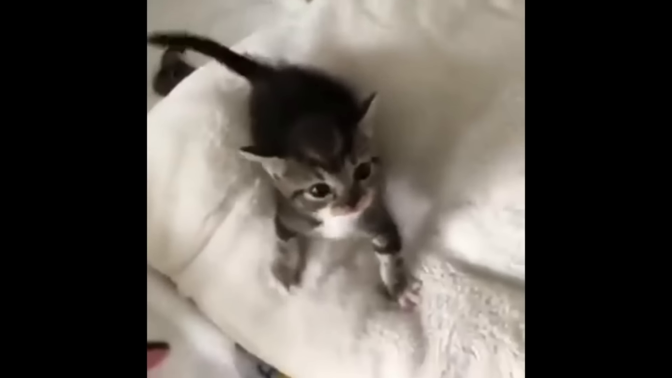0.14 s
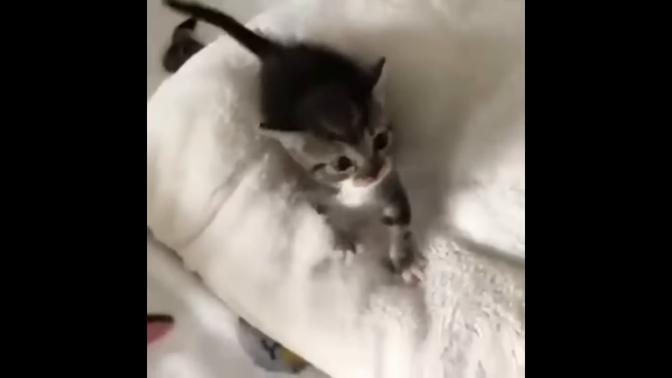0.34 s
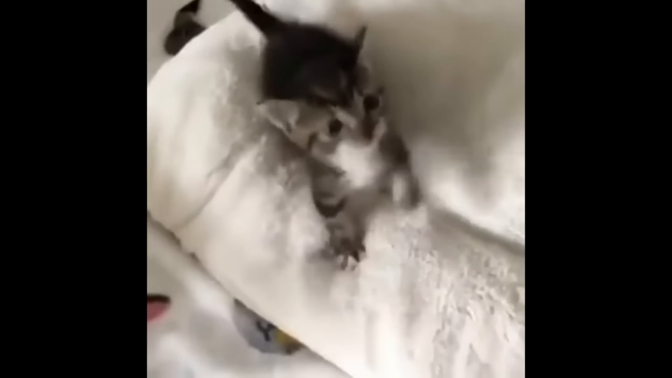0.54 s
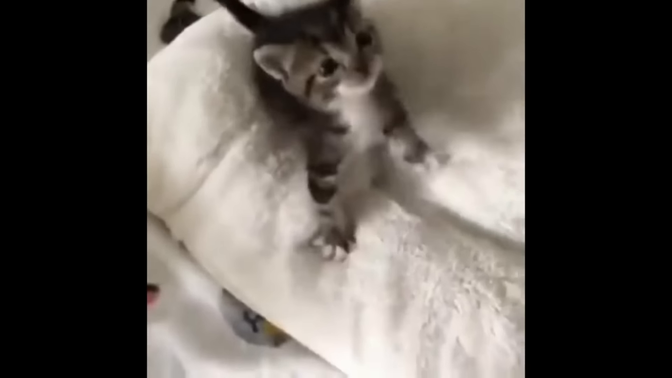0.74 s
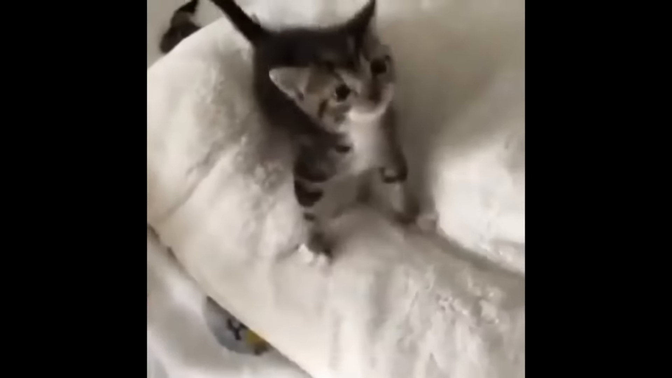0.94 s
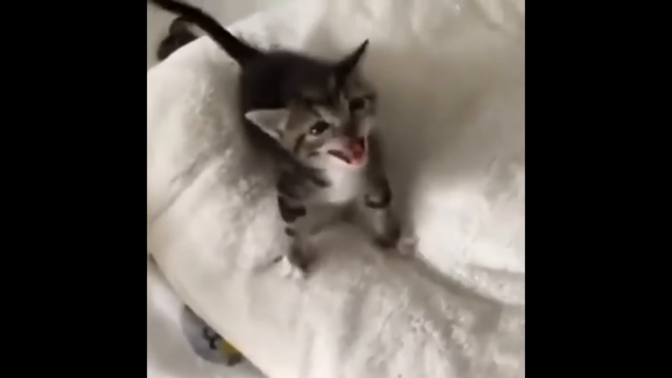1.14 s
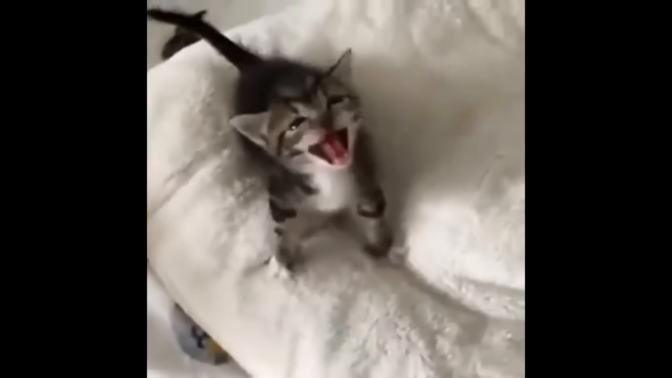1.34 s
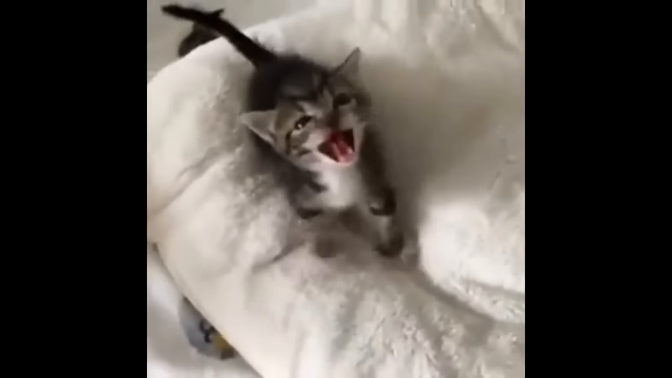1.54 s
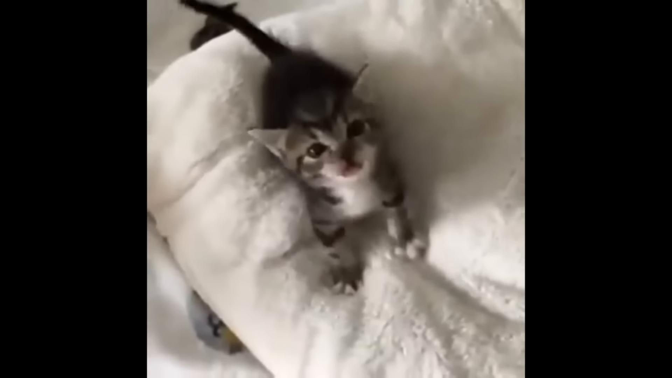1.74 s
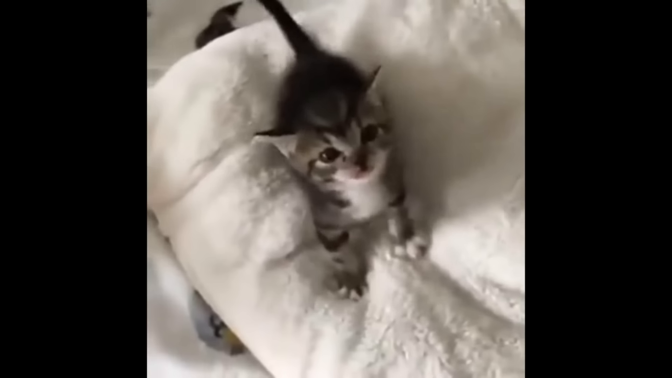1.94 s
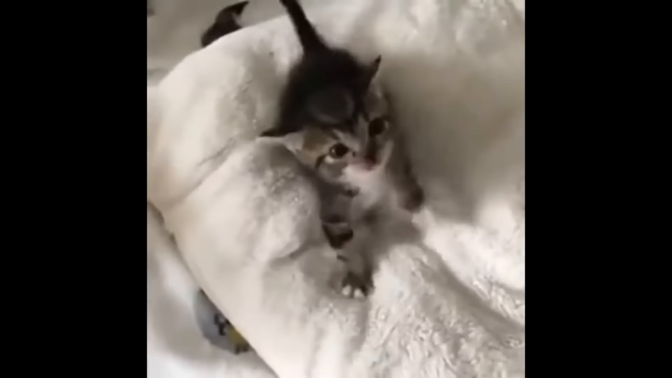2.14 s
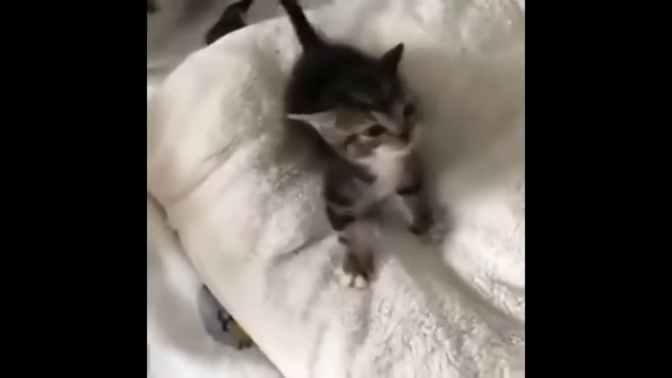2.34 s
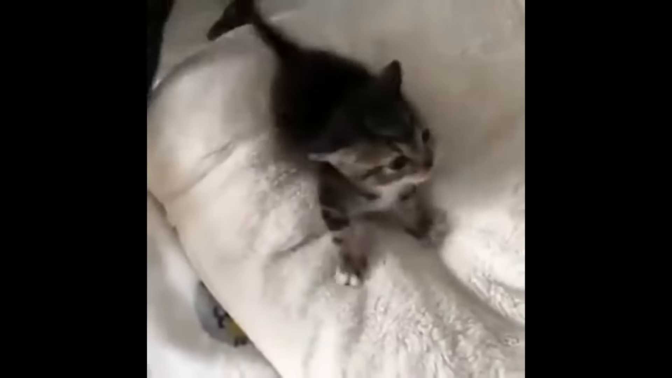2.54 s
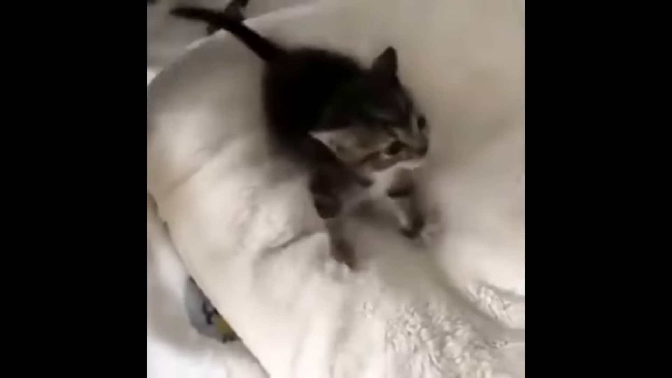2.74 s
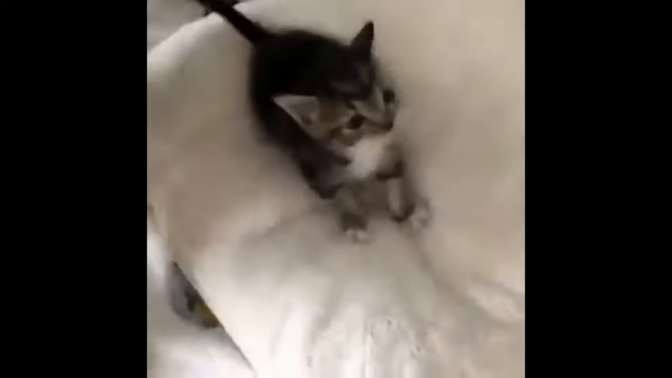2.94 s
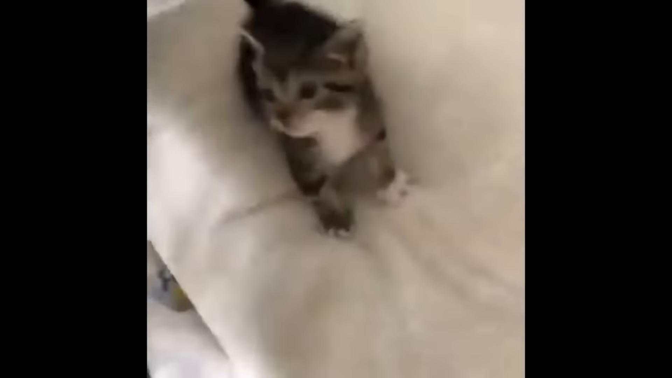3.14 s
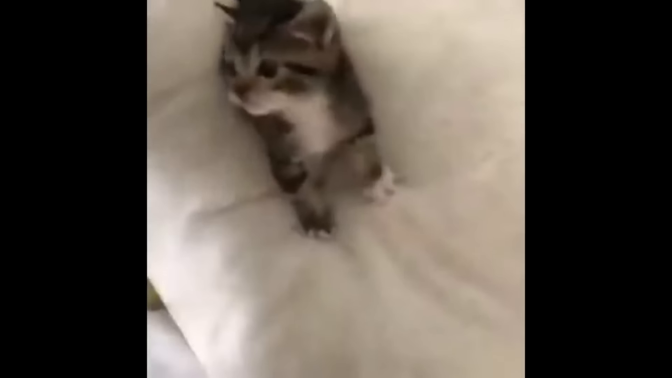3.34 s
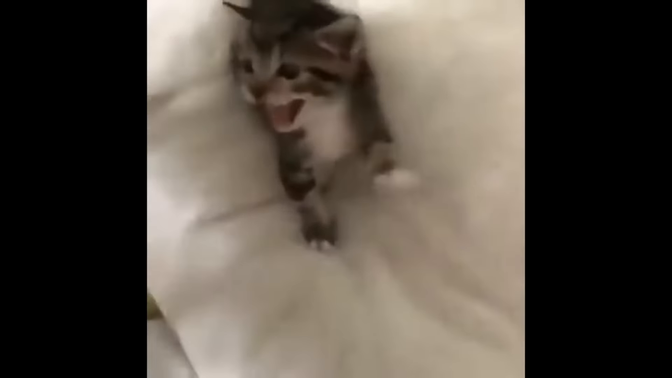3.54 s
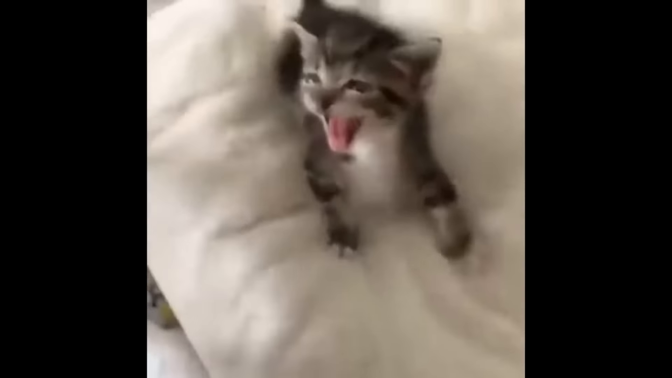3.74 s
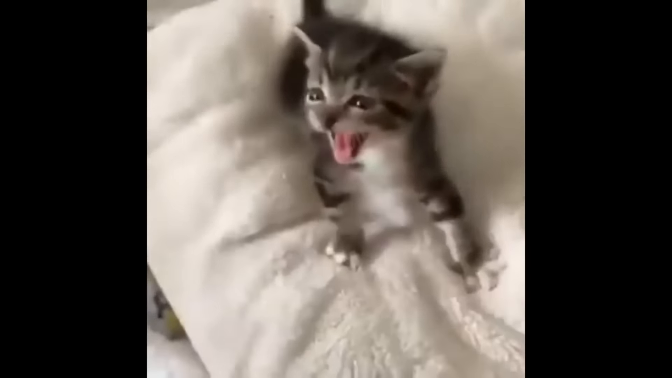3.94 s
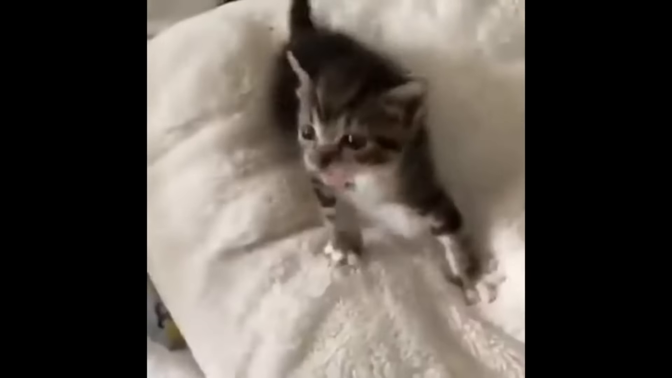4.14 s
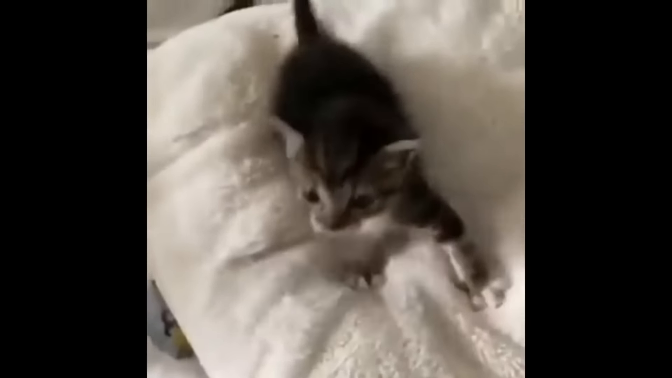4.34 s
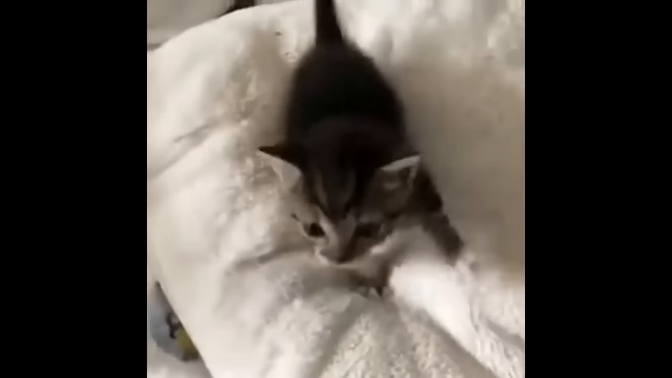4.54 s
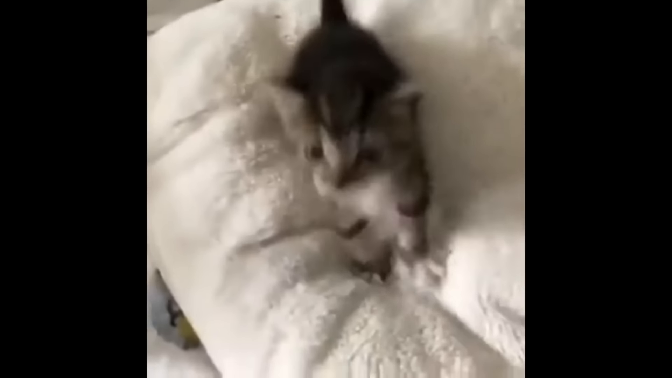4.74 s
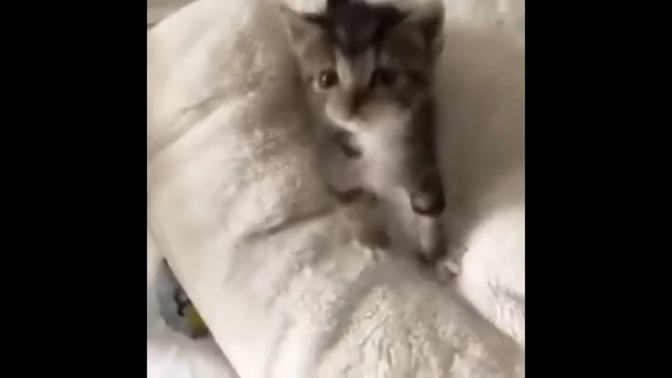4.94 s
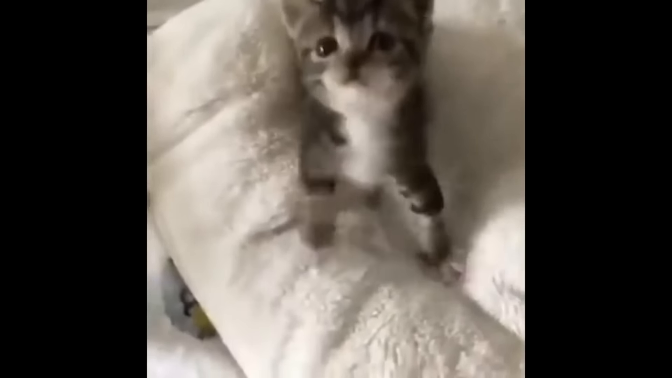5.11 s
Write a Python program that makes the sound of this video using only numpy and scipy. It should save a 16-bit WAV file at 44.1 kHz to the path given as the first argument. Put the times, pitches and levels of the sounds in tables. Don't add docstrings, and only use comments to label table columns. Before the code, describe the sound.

Piercing kitten meows, spaced by quiet gaps, on a soft blanket indoors, with a faint motor hum and hiss behind.

```python
import sys
import numpy as np
from scipy import signal
from scipy.fft import rfft, irfft, next_fast_len
from scipy.io import wavfile
from scipy.ndimage import uniform_filter1d, minimum_filter1d, map_coordinates

SR = 44100
rng = np.random.default_rng(int(sys.argv[2]) if len(sys.argv) > 2 else 0)


def convert_level_to_amplitude(level_db):
    exponent = np.asarray(level_db, float) / 20
    return 10 ** exponent


def dump(signal):
    limited = np.clip(np.atleast_2d(signal).T, -1, 1)
    pcm = np.round(limited * 32767).astype(np.int16)
    wavfile.write(sys.argv[1], SR, pcm)


N = 232583

# start_s, pitch_hz
CRY_PITCH = [
    [(0, 1703), (.062, 1671), (.082, 1787), (.13, 1801), (.142, 1679), (.165, 1628)],
    [(1.358, 978), (1.414, 1815), (1.465, 1830), (1.487, 1751), (1.63, 1736), (1.71, 1724), (1.838, 1643),
     (1.9, 1671), (1.942, 1740)],
    [(3.73, 844), (3.83, 1802), (3.875, 1814), (3.975, 1728), (4.04, 1699), (4.13, 1628), (4.237, 1689),
     (4.33, 1599), (4.357, 1738)],
]
RELEASE_S, FALL_HZ_PER_S = 0.095, 8600
# start_s, level_db, opening (0 to 1)
CRY_EFFORT = [
    [(0, -10, .59), (.062, -9.5, 0.53), (.082, -26.5, 0.58), (.1, -33, 0.78), (.13, -32, 0.72),
     (.142, -50, 0.7), (.175, -58, 0.47), (.27, -50, .02)],
    [(1.36, -53, .6), (1.417, -22, 0.76), (1.465, -10, 0.78), (1.6, -5.5, 0.75), (1.71, -5.5, .73),
     (1.838, -9, 0.5), (1.875, -30, 0.48), (1.935, -38.5, .55), (1.97, -71, 0.45)],
    [(3.755, -54, 0.48), (3.83, -15.5, 0.78), (3.885, -10.5, 0.83), (3.903, 1.5, 0.86), (3.975, -6, 0.79),
     (4.065, -7, .77), (4.09, -9.5, 0.74), (4.25, -14, 0.67), (4.37, -56, 0.53)],
]
# start_s, depth_hz, drop_s, recovery_s
VOICE_BREAKS = [
    (1.427, 55.7, .006, .012),
    (3.9, 240.2, .009, .038),
    (4.262, 32, .012, .02),
]
# start_s, share_lost, half_width_s
VOICE_DIPS = [
    (.134, .6, .005),
    (1.944, 0.56, 0.0055),
    (3.929, .4, .0035),
    (1.53, .25, .012),
]
# start_s, level_db, centre_hz, rise_s, t60_s
CATCHES = [(.142, -23, 3360, .008, 0.1), (.243, -38, 2000, .04, 0.11), (1.397, -37, 4600, .1, .1),
           (1.8, -34, 1675, 0.36, .6), (1.953, -27, 1590, .02, .33), (3.782, -27, 4020, .02, 0.13),
           (3.9, -28.5, 1630, 0.19, 0.37), (4.07, -31.5, 1690, 0.11, .8), (4.12, -24.5, 6500, 0.13, 0.34),
           (4.266, -21, 3220, .15, 0.064)]
CLIMB_LOSS = (0, 5, 2.5, 8.5)
# start_s, half_width_s, depth
STRAIN = (3.915, 0.047, 0.8)
# start_s, level_db, half_width_s
DOUBLING = [
    (3.907, -34, 0.011),
    (3.99, -53, 0.03),
]
# start_s, level_db, half_width_s
RASPS = [
    (3.903, -31, .018),
    (3.97, -37, .13),
    (3.8, -44, .035),
    (1.405, -42, .022),
]
# centre_hz, level_db per Hz
RASP_SPECTRUM = [(200, -4.5), (750, -3), (2500, -6), (4500, 0.5), (6200, 4)]
# centre_hz, level_db per Hz
BREATH_SPECTRUM = [(300, -11), (1000, -17.5), (2500, -18), (3900, -20), (4250, -7), (4800, -1.5),
                   (5500, -11), (6500, -4)]
# start_s, level_db, half_length_s, centre_hz, half_width_hz
HAZE = [
    (1.61, -36.5, 0.11, 4560, 270),
    (4.11, -40.5, 0.087, 4090, 250),
    (3.803, -34, 0.028, 4800, 990),
    (1.2, -47, 0.015, 5200, 900),
    (2.14, -49, 0.038, 7600, 1200),
]
SHUT_HZ, OPEN_OCTAVES = 1712, 2.004
BELOW_DB, ABOVE_DB = 33.5, 61.5
NOSE_DB, NOSE_HZ, NOSE_LOSS_DB = -29, 1553, 9
NOSE_BELOW_DB, NOSE_ABOVE_DB = 42.5, 16
BREATH_DB, BREATH_GROWS = -42, 0.29

# start_s, shrillness_db
SHRILLNESS = [
    [(0, -53), (.06, -50), (.09, -56.5), (.15, -52.5), (.2, -74)],
    [(1.37, -57.5), (1.412, -34), (1.46, -39.5), (1.5, -20.5), (1.54, -23.5), (1.7, -28), (1.782, -50),
     (1.93, -55.5), (1.96, -66)],
    [(3.77, -61.5), (3.806, -41), (3.874, -34), (3.898, -21.5), (3.93, -31.5), (3.964, -27), (4.032, -40),
     (4.06, -52), (4.3, -60.5)],
]
# start_s, hold_s, level_db, sag_db_per_s
LOW_TONE = [
    (.0, .16, -48, 5),
    (1.543, .24, -22, 12),
]
MID_TONE = [
    (3.889, 0.013, -19, 29.6),
    (3.956, 0.078, -15, 90),
]
HIGH_TONE = [
    (1.542, 0.25, -33, 21),
]
SUB_BAND_HZ = SR / 128
FIRST_DB, FIRST_GROWS, SECOND_DB = -6, 0.85, -2
OUSTED_DB, OUST_LEAD_S = 24.5, 0.024
COPY_LOSS_DB = 14
LOW_DB, LOW_GROWS = -17.5, 0.63
HIGH_DB, HIGH_GROWS, RASP_LIFT_DB = -28, 0.53, 2.5
TONE_RISE_S, TONE_T60_S = 0.027, 0.21

# start_s, peak_db, t60_s
PUFFS = [
    (1.476, -29, .25),
    (1.516, -42, .9),
    (1.7, -36, .2),
    (1.8, -50, 0.44),
    (3.928, -48, .3),
    (4.02, -52, .3),
    (4.11, -58, .3),
]
# centre_hz, level_db per Hz
PUFF_SPECTRUM = [(20, -22.5), (60, -10), (110, 4), (200, -8.5), (400, -26)]
PUFF_RISE_S = 0.13
# start_s, peak_db, pitch_hz, t60_s
KNOCKS = [
    (1.454, -26.5, 195.6, 0.21),
    (1.694, -37.5, 126, 0.22),
]
# start_s, peak_db, pitch_hz, t60_s
TICKS = [
    (3.3523, -38.5, 6296, 0.034),
    (3.3678, -45, 4070, 0.025),
    (5.2545, -41.5, 2930, 0.03),
]
# start_s, pitch_hz, level_db
MATE_MEW = [
    [(.42, 1643, -64), (.53, 1643, -52), (.6, 1546, -46), (.7, 1413, -52), (.8, 1294, -53),
     (.88, 1160, -59), (.93, 1066, -65)],
]
# centre_hz, t60_s
ROOM_DECAY = [(300, 0.38), (1700, 0.37), (3300, 0.47), (5000, 0.59), (7000, 0.26)]
# centre_hz, level_db
ROOM_COLOUR = [(300, 1.5), (1700, 7.5), (3300, 0.5), (5000, -4.5), (7000, 1.5)]

# start_s, level_db
MOTOR_LOAD = [(0.0, -60), (0.09, -42.5), (0.17, -59.5), (0.47, -46.5), (1.0, -63.5), (1.22, -46.5),
              (1.25, -57.5), (1.7, -63), (2.1, -50), (2.89, -56.5), (3.02, -43.5), (3.08, -51.5),
              (3.93, -51), (4.33, -60), (4.4, -50.5), (4.64, -63.5), (4.68, -46.5), (5.27, -60)]
# centre_hz, half_width_hz, level_db
DUCT = [
    (166, 27, -64),
    (2370, 37, -65.5),
    (3030, 110, -68.5),
]
# centre_hz, level_db per Hz
HISS_SPECTRUM = [(15, -92.5), (25, -32.5), (75, -6.5), (183, -4), (293, -11.5), (331, -7.5), (665, -10.5),
                 (831, -7.5), (965, -10), (1240, -14), (1630, -11), (2190, -12.5), (9490, -16.5),
                 (12300, -40), (20900, -120)]
HISS_DB, WHINE_DB = -47, -0.5
DRONE_DB, DRONE_GROWS = -57, 0.53
OVERTONE_DB, OVERTONE_GROWS = -61.5, 0.32


def kitten():
    release = [p + [(p[-1][0] + RELEASE_S, p[-1][1] - FALL_HZ_PER_S * RELEASE_S)] for p in CRY_PITCH]
    gate, pitch = curves(release)
    _, effort_db, opening = curves(CRY_EFFORT)
    for at, depth_hz, drop_s, recover_s in VOICE_BREAKS:
        width = np.where(np.arange(N) < at * SR, drop_s, recover_s)
        pitch = pitch - depth_hz * swell(at, width)
    pitch = uniform_filter1d(pitch, size=150)
    climb_hz_per_s = uniform_filter1d(np.gradient(pitch), size=600) * SR
    unsettled = np.clip(climb_hz_per_s / 6000 - 0.95, 0, 1)
    jitter = 0.0026 * wobble(90) + (0.002 + 0.008 * unsettled) * wobble(600)
    turns = np.cumsum(pitch * (1 + jitter)) / SR

    resonances = [(convert_level_to_amplitude(effort_db), SHUT_HZ * 2 ** (OPEN_OCTAVES * opening))]
    resonances += [(burst(s, db, rise_s, t60), hz) for s, db, hz, rise_s, t60 in CATCHES]
    nose = convert_level_to_amplitude(NOSE_DB - NOSE_LOSS_DB * opening + 0.99 * wobble(35))
    nose = nose * skirts(pitch, NOSE_HZ, NOSE_BELOW_DB, NOSE_ABOVE_DB)
    strain_s, strain_width, strain_depth = STRAIN
    voice = 0
    for k in range(4):
        size = sum(g * skirts((k + 1) * pitch, hz, BELOW_DB, ABOVE_DB) for g, hz in resonances)
        if k == 0:
            size = size + nose
        size = size * convert_level_to_amplitude(-CLIMB_LOSS[k] * unsettled)
        if k < 2:
            size = size * (1 + strain_depth * swell(strain_s, strain_width) * wobble(380))
        broken = 1 + min(0.3 + 0.15 * k, 1) * unsettled * (wobble(250) - 0.3)
        shimmer_db = 0.81 * wobble(160) + 1.1 * wobble(30)
        voice = voice + broken * size * tone((k + 1) * turns, shimmer_db)

    breath = convert_level_to_amplitude(BREATH_DB + BREATH_GROWS * effort_db + 2.8 * wobble(40)) * noise(BREATH_SPECTRUM)
    breath = breath * (1 + 0.5 * np.sin(2 * np.pi * turns))
    halves = sum(np.sin((2 * k + 1) * np.pi * turns) for k in range(3))
    halves = halves * swells(DOUBLING)
    rasp = noise(RASP_SPECTRUM) * swells(RASPS)
    haze = sum(convert_level_to_amplitude(db) * swell(s, width) * band(hz, wide) for s, db, width, hz, wide in HAZE)
    gate = gate * (1 - sum(share * swell(s, width) for s, share, width in VOICE_DIPS))
    return gate * (voice + halves + breath) + rasp, haze, turns, unsettled


def rebuilt_treble(turns, unsettled):
    slots = SUB_BAND_HZ * np.arange(N) / SR
    gate, shrill_db = curves(SHRILLNESS)
    start, hold, *_ = LOW_TONE[-1]
    ousted = burst(start - OUST_LEAD_S, 0, TONE_RISE_S, t60=3.46, hold_s=hold)
    first_db = FIRST_DB + FIRST_GROWS * shrill_db - OUSTED_DB * ousted + 2.9 * wobble(30)
    first = tone(turns + 16 * slots, first_db)
    second = tone(2 * turns + 16 * slots, shrill_db + SECOND_DB)
    copies = (first + second) * convert_level_to_amplitude(-COPY_LOSS_DB * unsettled)

    low_spectrum = [(6450, -47.5), (6650, 5.5), (7000, -4), (7300, -7.0), (7500, -51.5)]
    high_spectrum = [(7400, -64.5), (7550, -8.5), (8300, -5), (8900, -3), (9200, -53.5)]
    low = convert_level_to_amplitude(LOW_DB + LOW_GROWS * shrill_db) * noise(low_spectrum)
    high_gain = convert_level_to_amplitude(HIGH_DB + HIGH_GROWS * shrill_db) + convert_level_to_amplitude(RASP_LIFT_DB) * swells(RASPS)
    high = high_gain * noise(high_spectrum)
    out = gate * (copies + low + high)
    for centre, rows in ((19.5, LOW_TONE), (20.5, MID_TONE), (24.5, HIGH_TONE)):
        size = sum(burst(s, db, TONE_RISE_S, TONE_T60_S, hold_s, sag) for s, hold_s, db, sag in rows)
        out += size * tone(centre * slots, 1.4 * wobble(25))
    return out, gate


def puffs():
    blown = sum(burst(s, db, PUFF_RISE_S, t60) for s, db, t60 in PUFFS)
    out = blown * convert_level_to_amplitude(1.1 * wobble(13)) * noise(PUFF_SPECTRUM)
    for s, peak_db, hz, t60 in list(KNOCKS) + list(TICKS):
        t = np.maximum(np.arange(N) / SR - s, 0)
        decay = convert_level_to_amplitude(peak_db + 4.0 - 60 * t / t60)
        attack = 1 - np.exp(-t * hz / 2.9)
        out += decay * attack * np.sin(2 * np.pi * hz * t)
    return out


def mate():
    gate, pitch, db = curves(MATE_MEW)
    turns = np.cumsum(pitch * (1 + 0.003 * wobble(39.0))) / SR
    return gate * tone(turns, db + 2 * wobble(25))


def room(x):
    hz, t, z = signal.stft(rng.standard_normal(SR // 2), SR, nperseg=256)
    decay_db = along(ROOM_COLOUR, hz)[:, None] - 60 * t / along(ROOM_DECAY, hz)[:, None]
    tail = signal.istft(z * convert_level_to_amplitude(decay_db), SR, nperseg=256)[1]
    return signal.fftconvolve(np.pad(x, (400, 0)), tail / np.linalg.norm(tail))[:N]


def fan():
    _, load_db = curves([MOTOR_LOAD])
    swing_db = load_db - load_db.mean()
    whine = convert_level_to_amplitude(load_db + WHINE_DB) * band(836, 38.7)
    drone = convert_level_to_amplitude(DRONE_DB + DRONE_GROWS * swing_db + 2.5 * wobble(3.94)) * band(358.0, 88)
    overtone = convert_level_to_amplitude(OVERTONE_DB + OVERTONE_GROWS * swing_db + 1.8 * wobble(4)) * band(1606, 54)
    duct = sum(convert_level_to_amplitude(db + 1.3 * wobble(7.7)) * band(hz, width) for hz, width, db in DUCT)
    z = signal.stft(noise(HISS_SPECTRUM), nperseg=512)[2]
    patches = uniform_filter1d(rng.standard_normal(z.shape), size=4, axis=0)
    patches = uniform_filter1d(patches, size=8, axis=1)
    hiss = unit(signal.istft(z * convert_level_to_amplitude(2.16 * unit(patches)), nperseg=512)[1][:N])
    return whine + drone + overtone + duct + convert_level_to_amplitude(HISS_DB + 0.6 * wobble(7.2)) * hiss


def unit(x):
    return x / np.sqrt(np.mean(x ** 2) + 1e-20)


def along(points, hz):
    f, v = np.transpose(points)
    return np.interp(np.log(hz + 1), np.log(f + 1), v)


def curves(parts):
    t = np.arange(N) / SR
    s, *cols = np.transpose(np.concatenate(parts))
    gate = sum((t >= p[0][0]) & (t < p[-1][0]) for p in parts)
    gate = uniform_filter1d(gate * 1., size=400, mode="nearest")
    return gate, *[np.interp(t, s, c) for c in cols]


def wobble(rate):
    knots = rng.standard_normal(int(N * rate / SR) + 4)
    return map_coordinates(knots, [np.arange(N) * rate / SR])


def filtered(x, response):
    m = next_fast_len(N + SR // 2)
    return irfft(rfft(x, m) * response(np.fft.rfftfreq(m, 1 / SR)), m)[..., :N]


def noise(spectrum):
    shape = lambda hz: convert_level_to_amplitude(along(spectrum, hz)) * (hz < 1.05 * spectrum[-1][0])
    return unit(filtered(rng.standard_normal(N), shape))


def band(centre_hz, width_hz):
    response = lambda hz: 1 / (1 + ((hz - centre_hz) / width_hz) ** 4)
    return unit(filtered(rng.standard_normal(N), response))


def tone(turns, db):
    return np.sqrt(2) * convert_level_to_amplitude(db) * np.sin(2 * np.pi * turns)


def swell(s, width):
    return np.exp(-((np.arange(N) / SR - s) / width) ** 2)


def swells(rows):
    return sum(convert_level_to_amplitude(db) * swell(s, width) for s, db, width in rows)


def burst(s, db, rise_s, t60, hold_s=0., sag_db=0.):
    t = np.arange(N) / SR - s
    rise_db = 60 * np.minimum(t, 0) / rise_s
    held_db = sag_db * np.clip(t, 0, hold_s)
    decay_db = 60 * np.maximum(t - hold_s, 0) / t60
    return convert_level_to_amplitude(db + rise_db - held_db - decay_db)


def skirts(hz, centre_hz, below_db, above_db):
    octaves = np.log2(hz / centre_hz)
    return convert_level_to_amplitude(np.where(octaves < 0, below_db, -above_db) * octaves)


def scene():
    voice, haze, turns, unsettled = kitten()
    low_band = lambda hz: np.clip((19 * SUB_BAND_HZ - hz) / 200 + 0.5, 0, 1)
    treble, busy = rebuilt_treble(turns, unsettled)
    background = fan()
    background = background - 0.3 * busy * (background - filtered(background, low_band))
    core = filtered(voice + convert_level_to_amplitude(-18.5) * room(voice) + mate(), low_band)
    return (core + treble + background + haze + puffs())[None]


def masked(x, under_db, up, down, luck_db):
    z = signal.stft(x, nperseg=1024)[2]
    power = np.abs(z) ** 2
    local = np.abs(uniform_filter1d(power, size=5, axis=2))
    octaves = np.log2(np.arange(513) + 8.)
    apart = octaves[:, None] - octaves
    reach = convert_level_to_amplitude(-2 * np.where(apart > 0, up * apart, -down * apart))
    luck = uniform_filter1d(rng.standard_normal((129, z.shape[2])), size=9, axis=1)
    luck = np.repeat(unit(luck), 4, axis=0)[:513]
    mask = uniform_filter1d(reach @ power, size=7, axis=2) * convert_level_to_amplitude(2 * (under_db + luck_db * luck))
    keep = np.clip(local / (np.abs(mask) + 1e-20), 0, 1) ** 4
    return signal.istft(z * keep, nperseg=1024)[1][:, :N]


def limited(x, top):
    need = np.minimum(1, top / (np.abs(x) + 1e-9))
    return x * uniform_filter1d(minimum_filter1d(need, size=300), size=300)


def band_limit(x):
    return signal.sosfilt(signal.butter(12, 9640, fs=SR, output="sos"), x)


def record(dry):
    x = masked(dry, under_db=-32.5, up=22.0, down=50.0, luck_db=7.5)
    x = filtered(x, lambda hz: hz < 28 * SUB_BAND_HZ)
    x = limited(x, top=0.89)
    return band_limit(x)


dry = scene()
out = record(dry)
dump(out)
```